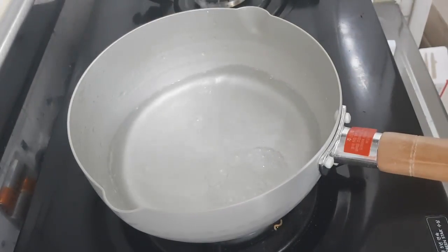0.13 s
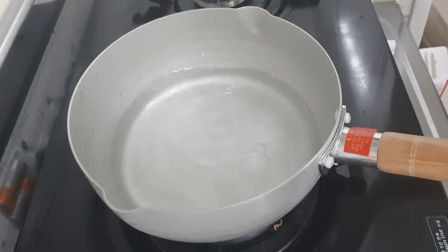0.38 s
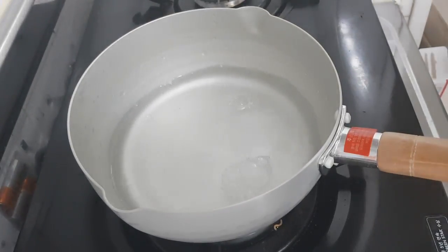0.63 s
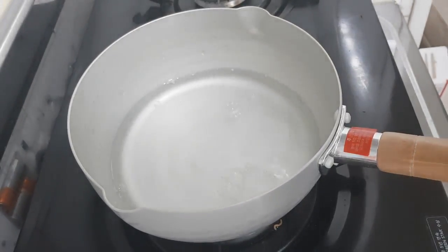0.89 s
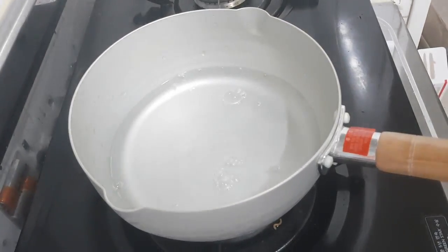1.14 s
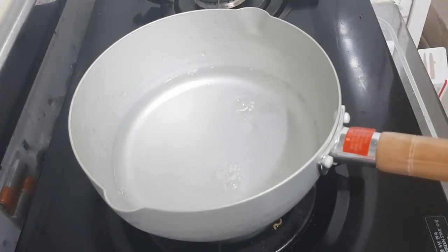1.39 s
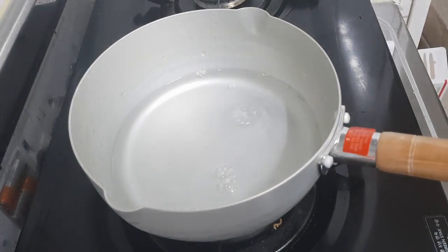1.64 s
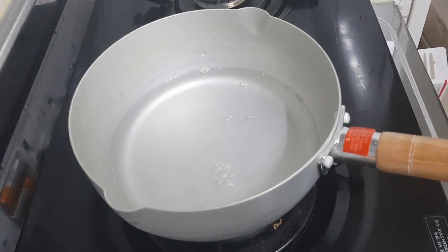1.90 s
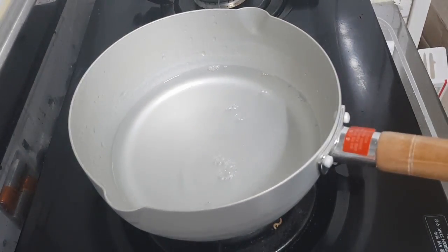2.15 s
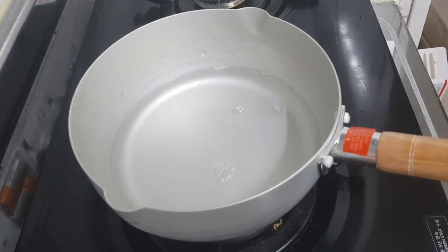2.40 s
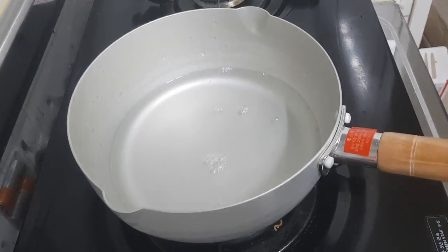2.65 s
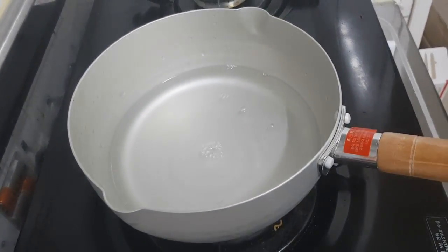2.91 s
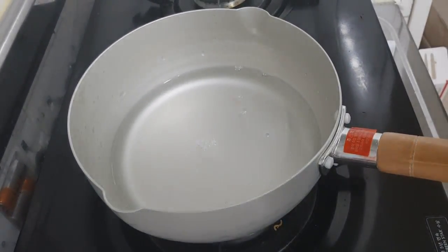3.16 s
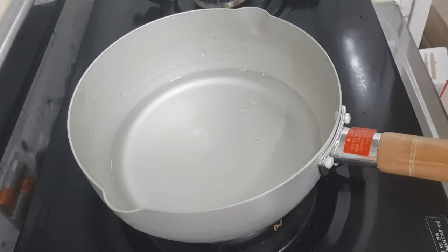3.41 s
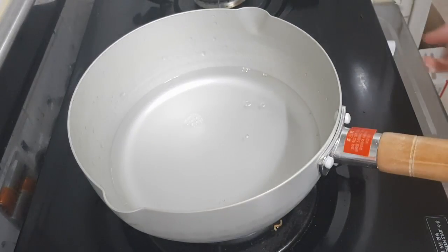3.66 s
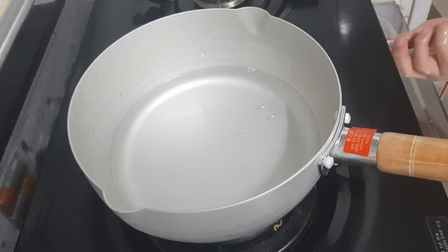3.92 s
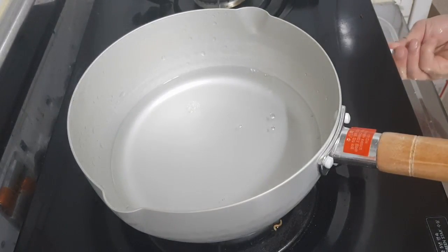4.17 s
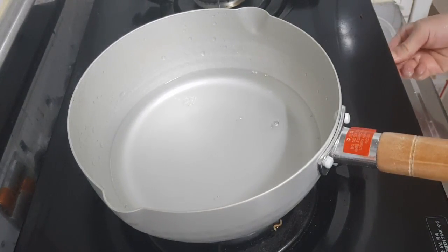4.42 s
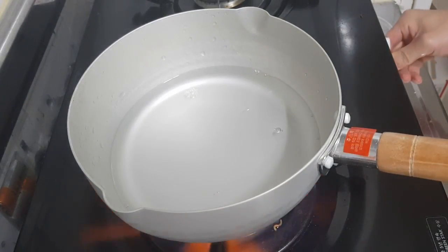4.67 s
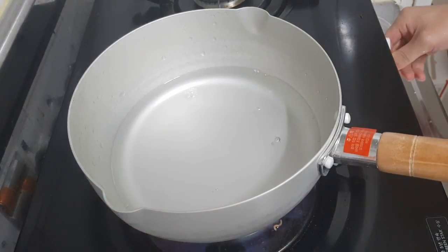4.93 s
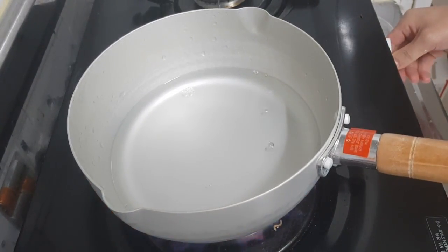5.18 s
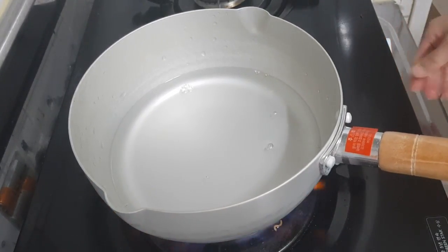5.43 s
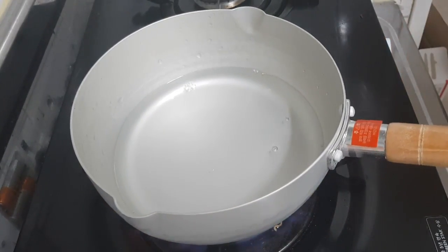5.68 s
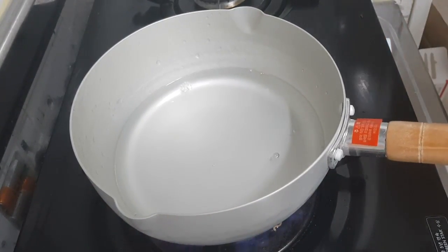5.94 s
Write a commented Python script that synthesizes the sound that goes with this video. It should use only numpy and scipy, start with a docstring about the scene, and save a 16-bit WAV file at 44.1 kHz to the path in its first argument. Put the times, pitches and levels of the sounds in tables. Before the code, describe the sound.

Close stereo pickup over a stove in a small, slightly reverberant kitchen. At first almost nothing: room hiss, rumble, barely audible bubble pops and sleeve rustles. Something woody bumps twice, the second softer. A hand rustles on the right and knocks the stove knob sharply; crisp electric ticks start in a fast, even run. The burner puffs alight with a boomy whoosh and keeps breathing and hissing while the ticking goes on to the end, crossed by a second knob clunk.

```python
"""The last bubbles burst on water in a saucepan and clothes rustle over the tone of a quiet kitchen.
Slippers scuff and a cabinet is bumped twice: filtered noise for friction, damped modes for blows.
A hand pushes and turns the stove knob on the right, and the igniter sparks 15 times a second, as impulses
through close echoes and a reverberant tail. The gas catches with a low whoosh, and the flame roars
under the pan as fluttering noise shaped by air resonances."""
import sys
import numpy as np
from scipy import signal
from scipy.io import wavfile
from scipy.ndimage import uniform_filter1d

SR = 44100
rng = np.random.default_rng(int(sys.argv[2]) if len(sys.argv) > 2 else 0)


def ratio(d):
    """dB to gain"""
    e = np.asarray(d, float) / 20
    return 10 ** e


def put_to_file(sound):
    """Save the sound as 16-bit audio at rate SR, in the file named by the first command-line argument."""
    columns = np.atleast_2d(sound).T  # one column per channel
    safe = np.clip(columns, -1, 1)
    whole_steps = np.round(safe * 32767)
    wavfile.write(sys.argv[1], SR, whole_steps.astype(np.int16))


N = 267246  # length in samples

# Igniter sparks. Each row: start in seconds, level in dB.
SPARKS = [(4.2407, -11), (4.3062, -10.5), (4.3715, -10.5), (4.4378, -9), (4.5058, -7.5), (4.5773, -12.5),
          (4.6423, -11), (4.707, -11.5), (4.774, -12), (4.8408, -12.5), (4.9066, -14), (4.9718, -14),
          (5.037, -12.5), (5.102, -14), (5.167, -13.5), (5.2313, -14), (5.297, -14), (5.362, -13.5),
          (5.4269, -13), (5.492, -13.5), (5.556, -12.5), (5.6217, -15), (5.686, -13), (5.751, -14),
          (5.8157, -14), (5.8815, -13.5), (5.9464, -15), (6.0109, -15)]
# Spectrum of a spark. Each row: frequency in Hz, relative level in dB.
SPARK_COLOUR = [(290, -24.5), (500, -31), (1590, -16.5), (1840, -17.5), (2540, -10.5), (3600, -17.5),
                (3880, -9), (4230, -8), (7060, 0.5), (8930, -7), (10200, -7), (11400, -13.5), (15100, 0.5),
                (15800, 6.5), (16500, -18)]
# Stereo balance of a spark. Each row: frequency in Hz, left over right in dB.
SPARK_BALANCE = [(1000, -8.5), (2500, -1), (4400, -8.5), (7000, -20), (9000, -3), (11500, -5), (13500, -42),
                 (15500, -15.5)]
# Reflections off pan, grate and hob. Each row: delay in seconds, level in dB, thinness from -1 to 1.
SPARK_ECHOES = [(0, -3, -.5), (.0004, 1, -.6), (.0009, 1, -.3), (.0016, -4, 0), (.0022, -1, .3),
                (.0029, 0, .6), (.0043, -8, .1), (.006, -9, 0)]
# Change of a spark in cold air: left over right in dB, treble above 11 kHz in dB, part below 3 kHz in dB.
COLD_AIR = (-1.7, -0.46, 0)
# The same three values, in dB, in thin hot gas.
HOT_GAS = (1.3, 1.64, -3.5)
SMEAR_COLD_S, SMEAR_HOT_S = 0.0022, 0.0056  # T60 of the blur on each close echo
BEND_DB = 1.5  # scatter of balance and treble from spark to spark in the flame

LIT_S = 4.51  # the gas catches
# Steady burning, in dB: boom under the pan, low roar, high roar, hiss.
BURN_DB = (-43.5, -45, -47.5, -51)
# The gas catches, then the flame flares now and then.
# Each row: peak in seconds, boom in dB, roar in dB, rise in seconds, fall in seconds.
FLARES = [(4.53, -26.5, -37, 0.017, 0.12), (4.615, -29, -33, 0.037, 0.064), (4.71, -34, -41, 0.015, 0.029),
          (4.94, -42.5, -68, 0.038, 0.034), (5.2, -40, -48, 0.047, 0.033), (5.33, -35.5, -53, 0.033, 0.079),
          (5.51, -36.5, -40.5, 0.065, 0.15), (5.664, -48, -44, 0.013, 0.058),
          (5.829, -37, -37, 0.024, 0.027), (6.031, -33.5, -37, 0.051, 0.016)]
# Swells of the jet hiss. Each row: peak in seconds, level in dB, rise in seconds, fall in seconds.
HISS_SWELLS = [(5.47, -39.5, 0.035, 0.057), (5.805, -35.5, 0.01, 0.05), (6.035, -43, 0.07, .02)]
# Spectra of the flame. Each row: frequency in Hz, relative level in dB.
BOOM_COLOUR = [(18, -55), (30, -27), (58, -5.5), (119, -1), (135, 1.5), (162, -12), (220, -40), (290, -46),
               (480, -120)]
ROAR_COLOUR = [(110, -12), (180, 3.5), (234, -7), (275, 0), (537, -8.5), (839, -7.5), (1500, -11),
               (3500, -20), (4550, -38), (7700, -120)]
HISS_COLOUR = [(880, -61), (1500, -7), (2690, -20), (3180, 2), (4330, -1.5), (7240, 9), (8660, 4.5),
               (12200, 5.5), (15100, -18), (16000, 2.5)]
# Resonances of the air between burner and pan. Each row: frequency in Hz, width in Hz, dB over the roar.
GAP_MODES = [(272, 17, 5.5), (354, 24, 4), (475.5, 14, 8), (610, 29, 5.5), (788, 21, 1), (1040, 12, 4),
             (1177, 22, 5), (1295, 10, 4)]
SPLIT_HZ = 700  # low and high roar meet here
HIGH_FLARE_DB = -8.5  # the high roar flares less than the low

# Blows on the knob. Each row: peak in seconds, level in dB, rise in seconds, rattle in seconds,
# T60 in seconds, room mode relative to the blow in dB.
KNOB_BLOWS = [(3.59, -66, 0.0019, 0.013, 0.075, -16), (3.862, -51, 0.002, 0.031, 0.3, -11),
              (3.964, -39, 0.0014, 0.005, 0.12, 14), (3.987, -18.5, 0.00183, 0.0042, 0.089, -6.5),
              (5.803, -27.5, 0.0015, 0.0091, 0.068, -6)]
# Bumps of the cabinet. Each row: peak in seconds, level in dB, rise in seconds, rattle in seconds,
# T60 in seconds, room mode relative to the blow in dB.
CABINET_BUMPS = [(2.131, -17.5, 0.0033, 0.032, 0.25, -10), (2.446, -23.5, 0.056, 0.0021, 0.19, -4.5)]
# Damped modes of the stove panel and the cabinet. Each row: frequency in Hz, width in Hz, level in dB.
PANEL_MODES = [(640, 60, -7), (930, 60, -13), (1020, 50, -10), (1180, 45, -3), (1310, 45, -3),
               (2300, 90, -12), (3350, 150, -18)]
CABINET_MODES = [(98, 60, -4), (200, 60, -7), (265, 50, -6), (380, 35, 3), (500, 45, -2), (600, 40, -2),
                 (990, 60, -17), (1230, 60, -17)]
# Spectra of the contact crunch. Each row: frequency in Hz, relative level in dB.
KNOB_COLOUR = [(24, -24), (40, 3.5), (137, 2.5), (200, -12), (297, -21), (480, -11.5), (770, -9),
               (1340, -8), (1760, -21), (2380, -16.5), (4130, -25), (4680, -20), (7000, -22),
               (11800, -19.5), (16000, -29)]
CABINET_COLOUR = [(24, -36), (40, -5), (104, 4.5), (249, 0.5), (402, -12), (570, -5), (800, -10.5),
                  (1440, -12.5), (1950, -15), (3300, -20), (6490, -28), (8990, -37), (11000, -28),
                  (16000, -37)]
ROOM_MODE_HZ, ROOM_MODE_T60_S = 116.6, 0.62  # lowest mode of the room

# Bubbles bursting. Each row: start in seconds, level in dB, frequency in Hz.
POPS = [(0.0288, -50, 11000), (0.0903, -50, 6000), (0.2165, -49, 6100), (0.2907, -52, 11500),
        (0.4175, -55, 4800), (0.5664, -50, 15400), (0.8, -51, 6340), (1.624, -50, 12000),
        (1.7804, -59, 14000), (1.844, -52, 11200), (4.141, -46, 10800)]

# Sleeves and hands moving. Each row: peak in seconds, level in dB, rise in seconds, fall in seconds,
# brightness from 0 to 1.
RUSTLES = [(0.03, -66.5, 0.022, 0.073, 0.53), (0.09, -64.5, .005, 0.067, .75),
           (0.31, -69, .02, 0.086, 0.98), (0.42, -73, .005, 0.024, 0.8), (0.7, -76, .3, 0.38, 0.66),
           (0.92, -59.5, 0.025, .09, 0.5), (1.28, -62, 0.23, 0.07, 0.3), (1.63, -78, .01, 0.04, 0.4),
           (1.86, -79, 0.042, 0.07, 0.4), (2.6, -64.5, 0.082, 0.13, 0.26), (2.72, -60, 0.01, 0.093, 0.6),
           (3.2, -68.5, 0.14, 0.14, 0.52), (3.43, -73, 0.039, 0.15, 0.24), (3.601, -53, 0.012, 0.056, 0.19),
           (3.7, -63.5, 0.061, 0.41, 0.1), (3.879, -49, 0.029, 0.035, 0.17), (3.93, -51, 0.023, 0.043, 0),
           (4.1, -59.5, 0.18, 0.081, .2)]
# Spectra of cloth friction. Each row: frequency in Hz, relative level in dB.
RUB_DULL = [(300, -10.5), (600, -7.5), (1150, -3), (1600, -5.5), (2400, -11), (4500, -7.5), (7000, -19),
            (8600, -20), (11000, -48)]
RUB_BRIGHT = [(300, -48), (1000, -41), (2800, -23), (4200, -1.5), (5200, -3), (7000, 0.5), (8600, -12.5),
              (11000, -15)]
RUB_FIBRES = [(6000, -40), (8600, -16), (10500, -2.5), (12000, -4), (14000, -7), (16000, -4)]
FIBRES_DB, FIBRES_PER_BRIGHT_DB = -3.5, 3  # finest fibres over the rub, and their growth with brightness

# A slipper on the floor. Each row: peak in seconds, level in dB, rise in seconds, fall in seconds.
SCUFFS = [(1.2, -68, 0.045, 0.1), (1.284, -59.5, 0.045, 0.046), (2.632, -65.5, 0.024, 0.051)]
# Spectrum of the scuff. Each row: frequency in Hz, relative level in dB.
SCUFF_COLOUR = [(600, -37), (1000, -1), (1250, 7), (1600, -2), (2100, -11), (3000, -45)]
# Soft low swells. Each row: peak in seconds, level in dB, rise in seconds, fall in seconds.
SWELLS = [(0.78, -70.5, 0.11, 0.086), (1.05, -71.5, 0.14, .2), (3.62, -68.5, 0.11, 0.46),
          (3.94, -60.5, 0.098, 0.093)]
# Spectrum of the swells. Each row: frequency in Hz, relative level in dB.
SWELL_COLOUR = [(150, -30), (250, -9), (350, 2), (480, 4), (650, -20), (1000, -25)]

# Spectra of the room hiss and rumble. Each row: frequency in Hz, relative level in dB.
ROOM_COLOUR = [(88, -17), (150, 0), (240, -19), (422, -14), (854, -18), (1020, -17), (1450, -20),
               (2810, -25.5), (3160, -21.5), (3620, -27), (4320, -23), (7180, -24.5), (8400, -32.5),
               (11500, -17.5), (16000, -23.5)]
RUMBLE_COLOUR = [(12, -33), (20, 10.5), (37, -2.5), (64, 7.5), (85, -2), (152, -14.5), (231, -20),
                 (300, -20), (390, -61), (660, -120)]
ROOM_DB = -69.5  # level of the room hiss
# Level curve of the rumble. Each row: time in seconds, level in dB.
RUMBLE_DB = [(0.0, -55), (0.15, -53), (0.66, -60.5), (0.8, -53.5), (1.43, -53), (1.8, -62), (2.1, -55),
             (2.8, -55), (2.94, -62.5), (3.1, -55.5), (3.9, -58), (3.95, -44.5), (4.02, -47), (4.1, -41),
             (4.2, -54.5), (4.33, -49.5), (4.45, -54.5)]
# Fridge and fan motors. Each row: frequency in Hz, level in dB.
HUM = [(635.2, -84.5), (694.4, -85), (979.8, -82), (1039, -86), (1098, -82), (1400, -97), (3117, -88.5),
       (4269, -87.5), (4328, -90)]
# Level curve of the compressor drone. Each row: time in seconds, level in dB.
DRONE_DB = [(0.0, -73.5), (0.27, -69), (0.78, -85.5), (0.95, -79), (1.65, -76.5), (1.85, -79), (2.0, -76.5),
            (2.95, -69), (3.3, -67), (3.8, -71.5), (4.3, -67.5)]
DRONE_HZ = 234

# Reverberation of the kitchen. Each row: frequency in Hz, T60 in seconds.
KITCHEN_T60 = [(500, 0.35), (1500, 0.24), (4000, 0.24), (10000, 0.17), (16000, 0.19)]
# Likeness of the two microphone ports. Each row: frequency in Hz, correlation from -1 to 1.
SAME_ROOM = [(60, 0.98), (240, 0.35), (950, 0), (3770, 0.01), (15000, 0.0084)]
SAME_STOVE = [(60, 1), (180, 0.98), (550, 0.82), (1650, -0.18), (4970, 0.028), (15000, -0.04)]
# Balance of room, stove, things moved on the right, and rumble.
# Each row: frequency in Hz, left over right in dB.
SIDE_ROOM = [(60, -20), (130, -18.5), (290, -13), (640, -0.5), (1410, -2.5), (3100, -0.5), (6820, -20.5),
             (15000, 4.5)]
SIDE_STOVE = [(60, -5.5), (130, -3.5), (290, -2.5), (640, -3.5), (1410, -7), (3100, -14.5), (6820, -18),
              (15000, -5)]
SIDE_RUB = [(60, -9), (130, -1.5), (290, -5.5), (640, -11.5), (1410, -10.5), (3100, -12), (6820, -19.5),
            (15000, -4)]
SIDE_RUMBLE = [(30, -7.5), (70, -10), (130, -1), (300, -12)]
LOW_HZ, EDGE_HZ = 35.2, 15800  # microphone bass cut; sharp upper band limit


def evened(x):
    """Normalisation: scales a signal to rms 1."""
    return x / np.sqrt(np.mean(x ** 2) + 1e-20)


def read(points, hz):
    """Interpolation of a frequency table on a logarithmic axis."""
    f, value = np.transpose(points)
    return np.interp(np.log(hz + 1), np.log(f + 1), value)


def curve(rows):
    """Linear interpolation of a level curve at every sample."""
    s, value = np.transpose(rows)
    return np.interp(np.arange(N) / SR, s, value)


def humps(s, db, rise, fall):
    """Exponential growth and decay: power of each event, changing 10 dB in its rise and its fall time."""
    late = np.arange(N) / SR - np.c_[s]
    below_peak = np.maximum(late / np.c_[fall], -late / np.c_[rise])
    return ratio(np.c_[db] - 10 * below_peak) ** 2


def add(mix, s, sound):
    """Superposition: mixes a stereo sound in at time s."""
    part = mix[:, max(round(s * SR), 0):][:, :sound.shape[1]]
    part += sound[:, :part.shape[1]]


def smoothed(x, size):
    """Low-pass filtering by two moving averages."""
    return uniform_filter1d(uniform_filter1d(x, size), size)


def noise(colour, same, side, size, patchy_db, count=N):
    """Partly coherent stereo noise of a given spectrum, whose level drifts in patches; mid rms 1."""
    hop, hz = size // 4, np.fft.rfftfreq(size, 1 / SR)
    a, b, c, d, patches = rng.standard_normal((5, len(hz), count // hop + 5))
    patches = uniform_filter1d(patches, size // 64, axis=0)  # over frequency
    patches = evened(uniform_filter1d(patches, 8, axis=1))  # over time
    like = np.clip(read(same, hz), -1, 1)[:, None]
    right, other = a + 1j * b, c + 1j * d
    left = (like * right + np.sqrt(1 - like ** 2) * other) * ratio(read(side, hz))[:, None]
    gain = ratio(read(colour, hz)[:, None] + patchy_db * patches)
    x = signal.istft(np.array([left, right]) * gain, nperseg=size, noverlap=size - hop)[1][:, :count]
    return x / np.sqrt(np.mean(x.mean(0) ** 2))


def causal(colour, size=1024):
    """Minimum phase: the impulse response whose phase follows from its log spectrum by Hilbert transform."""
    db = read(colour, abs(np.fft.fftfreq(size, 1 / SR)))
    log_gain = np.log(ratio(np.maximum(db, -70)))
    return np.fft.ifft(np.exp(signal.hilbert(log_gain).conj())).real[:size // 2]


def reverb_tail(count):
    """Diffuse reverberation: noise decaying band by band, alike at both ports in the bass; right energy 1."""
    hz, t, (right, other) = signal.stft(rng.standard_normal((2, count)), SR, nperseg=256)
    like = np.clip(read(SAME_STOVE, hz), -1, 1)[:, None]
    z = np.array([like * right + np.sqrt(1 - like ** 2) * other, right])
    decay = ratio(-60 * t / read(KITCHEN_T60, hz)[:, None])
    tail = signal.istft(z * decay, SR, nperseg=256)[1][:, :count]
    tail = tail * np.minimum(np.arange(count) / (0.005 * SR), 1)  # builds up over 5 ms
    return tail / np.linalg.norm(tail[1])


def spark_path(smear_s):
    """Multipath propagation from spark gap to both ports: smeared early echoes, then the kitchen tail."""
    path = ratio(5.0) * reverb_tail(count=9000)
    smear = ratio(-60 * np.arange(200) / SR / smear_s)
    for s, db, thin in SPARK_ECHOES:
        echo = signal.lfilter([1, -thin], 1, smear * rng.standard_normal((2, 200)))
        add(path, s, ratio(db) * echo / np.linalg.norm(echo[1]))
    return path


def igniter():
    """Refraction of impulses: spark paths are mostly alike in cold air, but moving hot gas bends each anew."""
    mix, still = np.zeros((2, N)), spark_path(SMEAR_COLD_S)
    hz, colour_db = np.transpose(SPARK_COLOUR)
    for s, level_db in SPARKS:
        lit = s > LIT_S
        steady, air, smear_s = (0.2, HOT_GAS, SMEAR_HOT_S) if lit else (0.85, COLD_AIR, SMEAR_COLD_S)
        balance_db, top_db, low_db = air
        top_bend, balance_bend = lit * BEND_DB * rng.standard_normal(2)
        path = steady * still + np.sqrt(1 - steady ** 2) * spark_path(smear_s)
        right = colour_db + (top_db + top_bend) * (hz > 11000) + low_db * (hz < 3000)
        left = right + read(SPARK_BALANCE, hz) + balance_db + balance_bend
        filters = [causal(np.c_[hz, left]), causal(np.c_[hz, right])]
        sound = signal.fftconvolve(path, filters, axes=1)
        add(mix, s + 0.0005, ratio(level_db + 13) * sound / np.linalg.norm(sound.mean(0)))
    return mix


def flame():
    """Turbulent combustion noise: a boom, a fluttering roar with air resonances and the hiss of the jets."""
    caught = np.clip((np.arange(N) / SR - LIT_S) / 0.0045, 0, 1)
    flutter = ratio(1.85 * evened(smoothed(rng.standard_normal(N), 900)))

    # Burning power plus the power of the flares.
    s, boom_db, roar_db, rise, fall = np.transpose(FLARES)
    extra = (humps(s, boom_db, rise, fall), humps(s, roar_db, rise, fall),
             humps(s, roar_db + HIGH_FLARE_DB, rise, fall), humps(*np.transpose(HISS_SWELLS)))
    boom_level, low_level, high_level, hiss_level = (
        np.sqrt(ratio(db) ** 2 + power.sum(0)) for db, power in zip(BURN_DB, extra))

    # The resonances stand on the roar, whose spectrum is then split in two.
    hz = np.geomspace(100, 8000, num=400)
    rings = sum(ratio(db) ** 2 / (1 + (2 * (hz - f) / width) ** 2) for f, width, db in GAP_MODES)
    colour_db = read(ROAR_COLOUR, hz) + 10 * np.log10(1 + rings)
    high = 1 / (1 + (SPLIT_HZ / hz) ** 6)
    roar = 0
    for level, share in ((low_level, 1 - high), (high_level, high)):
        part = np.c_[hz, colour_db + 10 * np.log10(share)]
        roar = roar + level * noise(part, SAME_STOVE, SIDE_STOVE, size=2048, patchy_db=2.35)

    boom = boom_level * noise(BOOM_COLOUR, SAME_STOVE, SIDE_STOVE, size=4096, patchy_db=1.74)
    hiss = hiss_level * noise(HISS_COLOUR, SAME_STOVE, SIDE_STOVE, size=512, patchy_db=3)
    return caught * (flutter * (boom + roar) + hiss)


def blows(events, modes, colour, ring_db, wet_db):
    """Modal excitation: a blow and its bounces ring damped modes under a crunch; the room responds."""
    mix, t = np.zeros((2, N)), np.arange(SR * 2 // 3) / SR
    body = sum(ratio(db) * np.exp(-np.pi * width * t) * np.sin(2 * np.pi * hz * t) for hz, width, db in modes)
    room_mode = ratio(-60 * t / ROOM_MODE_T60_S) * np.sin(2 * np.pi * ROOM_MODE_HZ * t)
    room_mode = room_mode * np.minimum(t / 0.02, 1)
    for s, db, rise, rattle, t60, mode_db in events:
        contact = np.minimum(t / rise, 1) ** 2 * ratio(-60 * np.maximum(t - rise - rattle, 0) / t60)
        crunch = contact * noise(colour, SAME_STOVE, SIDE_RUB, size=2048, patchy_db=0, count=len(t))
        bounces = (rng.random(len(t)) < 180 / SR) * rng.uniform(-1.2, 1.2, len(t))  # about 180 a second
        bounces[round(rise * SR)] = 1.2  # the main blow
        ring = signal.fftconvolve(bounces * contact, body)[:len(t)]
        direct = crunch + ratio(ring_db) * ring / abs(body).max() * ratio([[-3], [2.5]])
        wet = signal.fftconvolve(direct, reverb_tail(count=len(t)), axes=1)[:, :len(t)]
        add(mix, s + 0.0018 - rise, ratio(db - 13.0) * (direct + ratio(wet_db) * wet))
        add(mix, s, ratio(db + mode_db - 8.5) * room_mode * ratio([[-2.2], [1.8]]))
    return mix


def pops():
    """Bubble oscillation: each burst is a rapidly damped sine followed by its reverberation."""
    mix, t = np.zeros((2, N)), np.arange(200) / SR
    for s, db, hz in POPS:
        ping = np.sin(2 * np.pi * hz * t) * ratio(-60 * t / 0.003)  # T60 of 3 ms
        sound = signal.fftconvolve(ping[None], ratio(0.5) * reverb_tail(count=6000), axes=1)
        sound[:, :len(t)] += ping
        add(mix, s, ratio(db) * sound * ratio([[-3], [3]]))
    return mix


def rustle():
    """Cloth friction: patchy noise that blends a dull and a bright rub, topped by fine fibres."""
    s, db, rise, fall, bright = np.transpose(RUSTLES)
    power = humps(s, db, rise, fall)
    fibres = ratio(FIBRES_DB + FIBRES_PER_BRIGHT_DB * bright) ** 2
    mix = 0
    for share, colour in ((1 - bright, RUB_DULL), (bright, RUB_BRIGHT), (fibres, RUB_FIBRES)):
        rub = noise(colour, SAME_ROOM, SIDE_RUB, size=256, patchy_db=2.0)
        mix = mix + np.sqrt(share @ power) * rub
    return mix


def scuffs():
    """Sliding friction: a sole drags over the floor as lumpy noise in one broad resonance."""
    level = np.sqrt(humps(*np.transpose(SCUFFS)).sum(0))
    return level * noise(SCUFF_COLOUR, SAME_ROOM, SIDE_RUB, size=512, patchy_db=5)


def swells():
    """Amplitude modulation: soft low noise that comes and goes."""
    level = np.sqrt(humps(*np.transpose(SWELLS)).sum(0))
    return level * noise(SWELL_COLOUR, SAME_STOVE, SIDE_RUB, size=1024, patchy_db=1.5)


def wavering(hz, slow):
    """Random amplitude and phase modulation of a sine; rms 1."""
    level, phase = (evened(smoothed(drift, slow)) for drift in rng.standard_normal((2, N)))
    return evened(ratio(1.5 * level) * np.sin(2 * np.pi * hz * np.arange(N) / SR + 1.3 * phase))


def room_tone():
    """Stationary background: diffuse hiss, a rumble of varying level and wavering motor lines."""
    hum = sum(ratio(db) * wavering(hz, slow=1500) for hz, db in HUM)
    hum += ratio(curve(DRONE_DB)) * wavering(DRONE_HZ, slow=1200)
    hiss = ratio(ROOM_DB) * noise(ROOM_COLOUR, SAME_ROOM, SIDE_ROOM, size=1024, patchy_db=3.0)
    rumble = noise(RUMBLE_COLOUR, SAME_ROOM, SIDE_RUMBLE, size=4096, patchy_db=2.05)
    return hiss + ratio(curve(RUMBLE_DB)) * rumble + hum * ratio([[-4], [3]])


def scene():
    """Linear superposition of all sources in the kitchen."""
    knob = blows(KNOB_BLOWS, PANEL_MODES, KNOB_COLOUR, ring_db=6.5, wet_db=3.0)
    cabinet = blows(CABINET_BUMPS, CABINET_MODES, CABINET_COLOUR, ring_db=3.5, wet_db=-7.5)
    return igniter() + flame() + knob + cabinet + pops() + rustle() + scuffs() + swells() + room_tone()


def low_pass(x):
    """Removes everything above the highest recorded frequency."""
    return signal.sosfilt(signal.butter(12, 16980, fs=SR, output="sos"), x)


def record(dry):
    """Linear filtering: the bass cut of the microphone, then a sharp upper band limit."""
    bass_cut = signal.butter(3, LOW_HZ, "high", fs=SR, output="sos")
    thin = signal.sosfilt(bass_cut, dry)
    edge = signal.firwin(255, EDGE_HZ, window=("kaiser", 5), fs=SR)
    mix = signal.oaconvolve(thin, edge[None], "same", axes=1)
    return low_pass(mix)


dry = scene()
out = record(dry)
put_to_file(out)
```